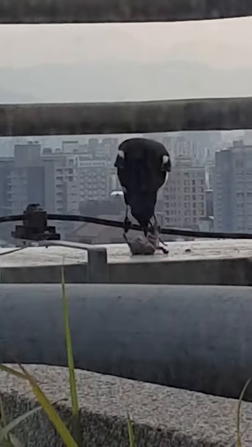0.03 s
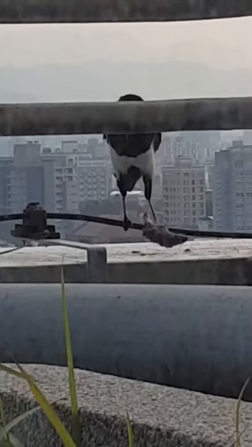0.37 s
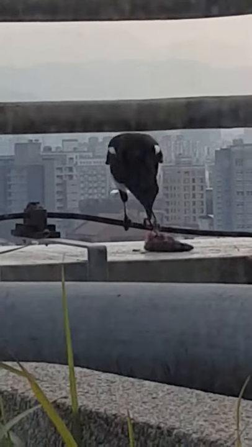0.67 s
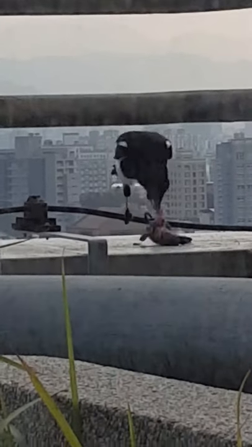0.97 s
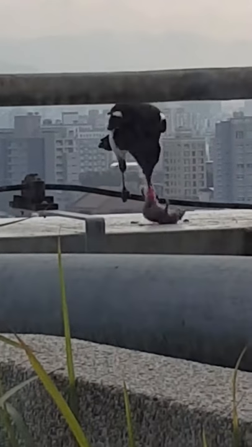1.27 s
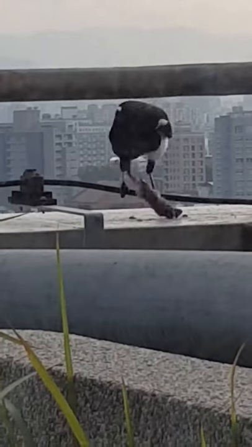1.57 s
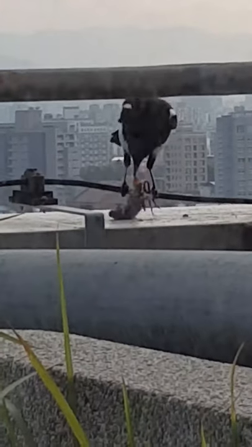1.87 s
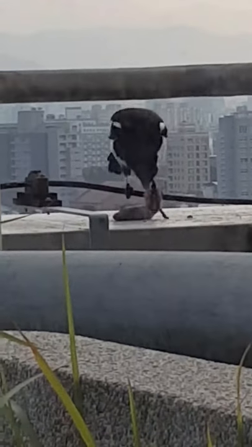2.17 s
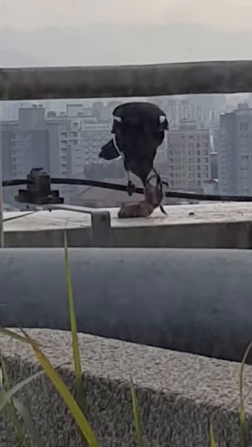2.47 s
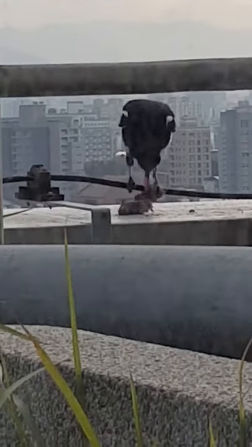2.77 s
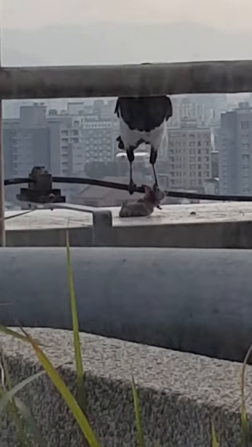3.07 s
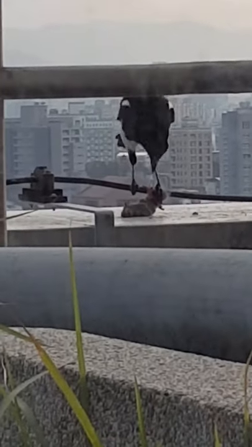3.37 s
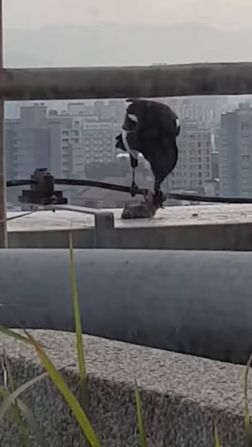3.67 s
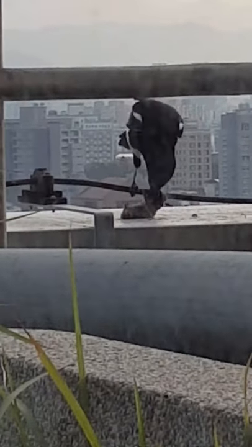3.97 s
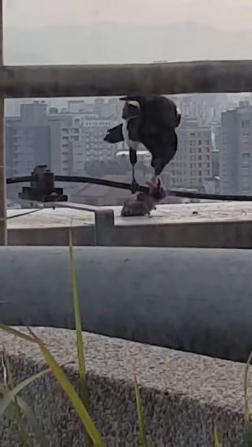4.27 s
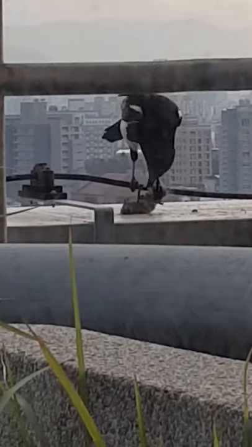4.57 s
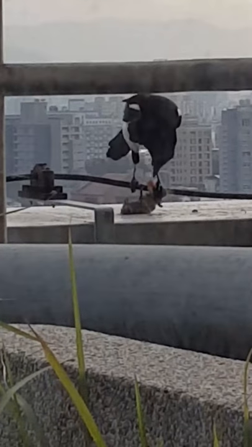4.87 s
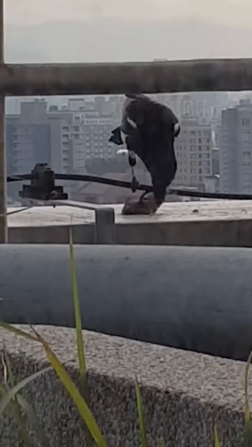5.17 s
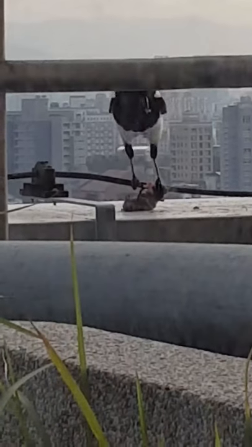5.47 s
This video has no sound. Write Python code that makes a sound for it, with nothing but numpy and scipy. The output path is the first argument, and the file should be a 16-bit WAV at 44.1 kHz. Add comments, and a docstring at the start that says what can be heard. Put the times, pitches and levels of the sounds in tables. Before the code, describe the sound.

A quiet, continuous low hum comes from air ducts on a city rooftop, its two main notes pulsing irregularly over softer ringing tones. At the same time, far-off traffic rumbles and rushes, gently rising and falling, with a slight hiss above it. Nothing starts or stops along the way. A close pair of microphones picks it up, a little stronger on the left.

```python
"""A rooftop above a city. A ventilation system drones: rushing air rings its ducts at two
strong, throbbing pitches and many weaker ones. Behind it, distant traffic makes a low rumble
and a steady wash of noise. A faint hiss and a thin, very high sizzle lie on top.
Two microphones, close together, pick it all up."""
import sys
import numpy as np
from scipy import signal
from scipy.fft import rfft, irfft
from scipy.io import wavfile
from scipy.ndimage import uniform_filter1d

SR = 44100
rng = np.random.default_rng(int(sys.argv[2]) if len(sys.argv) > 2 else 0)


def wav_out(sig):
    """Save sig, one row per channel (or a flat mono array), as 16-bit PCM at SR to the path in sys.argv[1]."""
    wavfile.write(sys.argv[1], SR, np.round(np.clip(np.atleast_2d(sig).T, -1, 1) * 32767).astype(np.int16))


N = 242991
PITCHES_HZ = np.fft.rfftfreq(N, 1 / SR)


def gain_of(db):
    """Turns decibels into a gain, the number to multiply a sound by."""
    return 10 ** (np.asarray(db) / 20)


def evened(sound):
    """Scales a sound so that its average power is 1."""
    return sound / np.sqrt(np.mean(abs(sound) ** 2) + 1e-30)


def gain_over_time(points):
    """A gain for each sample, joining (time_s, level_db) points."""
    time_s, level_db = np.transpose(points)
    return gain_of(np.interp(np.arange(N) / SR, time_s, level_db))


def tone_shape(points):
    """A gain for each pitch, joining (pitch_hz, level_db) points."""
    pitch_hz, level_db = np.transpose(points)
    return gain_of(np.interp(np.log(PITCHES_HZ + 1), np.log(pitch_hz + 1), level_db))


def resonance(pitch_hz, width_hz):
    """Gains that let through only a narrow band around one pitch."""
    return 1 / np.sqrt(1 + ((PITCHES_HZ - pitch_hz) / (width_hz / 2)) ** 4)


def noise(gains):
    """Noise with a gain for each pitch, as complex numbers whose size is its level."""
    real, imaginary = rng.standard_normal((2, len(gains)))
    return evened(np.fft.ifft(gains * (real + 1j * imaginary), N))


def steadied(sound, seconds):
    """Removes level drifts slower than the given time and keeps the quicker throbs."""
    return sound / np.sqrt(uniform_filter1d(abs(sound) ** 2, int(seconds * SR)) + 1e-6)


def placed(sound, left_louder_db, left_lead_rad):
    """Sound from one direction reaches one microphone louder, and one earlier in its wave."""
    half = gain_of(left_louder_db / 2) * np.exp(1j * left_lead_rad / 2)
    return np.sqrt(2) * np.array([sound * half, sound / half]).real


def flicker(pair, depth_db):
    """Turns small random patches of time and pitch slightly up or down."""
    grid = signal.stft(pair, nperseg=256)[2]
    patches = uniform_filter1d(rng.standard_normal(grid.shape[1:]), size=7, axis=0)  # blur over pitch
    patches = evened(uniform_filter1d(patches, size=6, axis=1))  # blur over time
    return signal.istft(grid * gain_of(depth_db * patches), nperseg=256)[1][:, :N]


def narrow_bands(rows):
    """Steady narrow bands of noise, each from its own direction."""
    pair = np.zeros((2, N))
    for pitch_hz, width_hz, level_db, left_louder_db, left_lead_rad in rows:
        band = steadied(noise(resonance(pitch_hz, width_hz)), seconds=0.73)
        pair += gain_of(level_db) * placed(band, left_louder_db, left_lead_rad)
    return pair


# The nearly even tone of the hiss: pitch_hz, relative_level_db
HISS_TONE = [(100, 0), (4000, 0), (8000, -.5), (11000, -0.44), (15000, 0.57), (16000, 0.74)]

def hiss():
    """A faint, slightly flickering hiss, made of separate noise for left and right."""
    pair = evened(np.array([noise(tone_shape(HISS_TONE)).real for channel in range(2)]))
    return gain_of(db=-78) * flicker(pair, depth_db=1.0)


# Thin bands at the very top: pitch_hz, width_hz, level_db, left_louder_db, left_lead_rad
SIZZLE_BANDS = [(15400, 300, -100, 0, 0), (15555, 45, -99.5, 1, -.5), (15695, 65, -95.5, 2, -.5)]

def sizzle():
    """A barely audible, very high sizzle."""
    return narrow_bands(SIZZLE_BANDS)


# The tone of distant traffic: pitch_hz, relative_level_db
TRAFFIC_TONE = [(20, -25.5), (100, -2.5), (220, -4.5), (280, 3), (370, -1.5), (500, -7), (650, -8.5),
                (900, -14), (1300, -17), (1700, -17.5), (2400, -23), (3300, -28.5), (5000, -35.5),
                (10000, -48)]

def traffic_wash(mic_spacing_m=0.17, sound_speed_m_s=343):
    """Traffic from all sides: the microphones agree only on waves longer than the gap between them."""
    likeness = 0.82 * np.sinc(2 * PITCHES_HZ * mic_spacing_m / sound_speed_m_s)
    tone = tone_shape(TRAFFIC_TONE)
    shared = rfft(rng.standard_normal(N)) * tone * np.sqrt(1 + likeness)
    opposite = rfft(rng.standard_normal(N)) * tone * np.sqrt(1 - likeness)
    pair = evened(irfft(np.array([shared + opposite, shared - opposite]), N))
    lean_left = gain_of(db=[[1.1], [-1.1]])
    return gain_of(db=-58) * lean_left * flicker(pair, depth_db=0.78)


# The deep tone of the city's rumble: pitch_hz, relative_level_db
RUMBLE_TONE = [(5, -29.5), (14, -26), (21, -7), (32, -7.5), (45, -3), (65, -0.5), (105, 1), (165, 2.5),
               (225, -5.5), (275, -11), (380, -18.5), (600, -25.5), (1200, -62)]
# Its slow rises and falls: time_s, relative_level_db
RUMBLE_SURGES = [(0, -55.5), (0.9, -56), (1.28, -51.5), (1.5, -55), (2.26, -53.5), (2.52, -57.0),
                 (3.1, -53), (3.6, -55.5), (4.1, -51), (4.56, -60.5), (4.85, -55), (5.51, -56.0)]

def city_rumble():
    """Long sound waves surge slowly and reach both microphones nearly alike."""
    rumble = steadied(noise(tone_shape(RUMBLE_TONE)), seconds=0.34)
    surges = evened(gain_over_time(RUMBLE_SURGES))
    return gain_of(db=-53.5) * placed(rumble * surges, left_louder_db=2.0, left_lead_rad=0.15)


# The ducts' weaker notes: pitch_hz, width_hz, level_db, left_louder_db, left_lead_rad
DUCT_NOTES = [(59.6, 4.3, -61.5, 2.2, 0.2), (80.7, 8.6, -63, 1, 0.77), (124, 13, -60, 4, 0),
              (187.2, 12, -56, -1.5, 0.5), (252.7, 13.3, -56.5, 2, 0.83), (286.9, 19.3, -61, 8.5, 1),
              (307.7, 9.6, -61, 5, 0.38), (322.2, 8.8, -61.5, 8, 1.67), (343.2, 15, -66, -5.5, 0.6),
              (375.3, 11, -73.5, 8, 0.2), (398, 11, -69.5, 5, 1.6), (420.6, 17, -65.5, 6, 1.17),
              (444.3, 10.8, -65.5, 2.5, 0.42), (468.6, 12, -69.5, 5.5, .5), (525, 20, -75, 7.5, 0.1),
              (556.7, 8.9, -71, 5.5, 0.5), (581.5, 16, -78.5, 9, 1), (672.7, 43, -72, -2, 0.85),
              (712.7, 11, -75.5, 8, 1.5), (728.4, 21, -73, -1, 1.5), (798, 18, -74, 1.5, 2),
              (851, 15, -81, 3.5, 2.5), (984.7, 17, -78.5, 5, 2), (1173, 25, -82, -4, 2)]

def duct_hum():
    """The air ducts ring softly at many pitches at once."""
    return narrow_bands(DUCT_NOTES)


# The drone's two strong notes: pitch_hz, width_hz, left_louder_db, left_lead_rad
DRONE_NOTES = [(137.6, 12.6, 3.5, 0.12), (202, 15.5, 0.5, 0.24)]
# How the lower and the upper note swell and fade: time_s, relative_level_db
LOWER_SWELLS = [(0, -58.5), (0.36, -47.5), (0.68, -54.5), (0.95, -48.5), (1.68, -48.0), (2.05, -52),
                (2.26, -47), (2.6, -57), (2.84, -47), (3.18, -50), (3.33, -55.0), (3.55, -46), (3.8, -51),
                (4.03, -47.0), (4.3, -53.5), (4.55, -49.0), (5.51, -50)]
UPPER_SWELLS = [(0, -52), (0.65, -55), (0.9, -53.5), (1.04, -48.5), (1.9, -52.5), (2.3, -47.5),
                (2.52, -54.5), (2.76, -49.5), (2.92, -54.5), (3.6, -53.5), (4.08, -51), (4.5, -50.5),
                (4.7, -53.5), (5.51, -53)]

def ventilation_drone():
    """Swirling air rings two strong notes. Each throbs at random, faster the wider its band is."""
    pair = np.zeros((2, N))
    for note, swells in zip(DRONE_NOTES, (LOWER_SWELLS, UPPER_SWELLS)):
        pitch_hz, width_hz, left_louder_db, left_lead_rad = note
        ring = steadied(noise(resonance(pitch_hz, width_hz)), seconds=0.26)
        pair += placed(ring * gain_over_time(swells), left_louder_db, left_lead_rad)
    return gain_of(db=-0.46) * pair


def scene():
    """The ventilation, the city and the hiss, all sounding together."""
    return ventilation_drone() + duct_hum() + city_rumble() + traffic_wash() + hiss() + sizzle()


def record(dry, cutoff_hz=15770):
    """Fades both ends very briefly and cuts off the highest treble."""
    fades = signal.windows.tukey(N, 0.002)
    treble_cut = signal.firwin(2047, cutoff_hz, window=("kaiser", 8), fs=SR)
    return signal.oaconvolve(dry * fades, treble_cut[None], "same")


dry = scene()
out = record(dry)
wav_out(out)
```